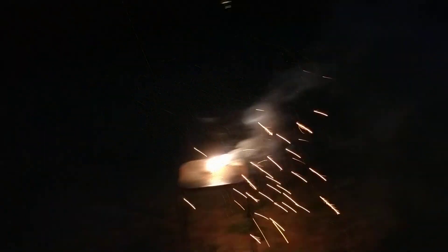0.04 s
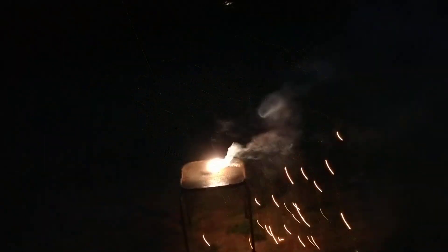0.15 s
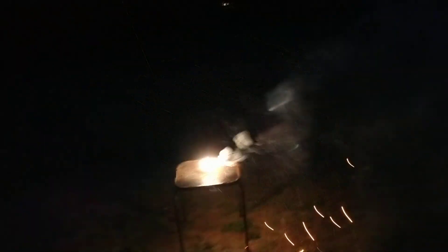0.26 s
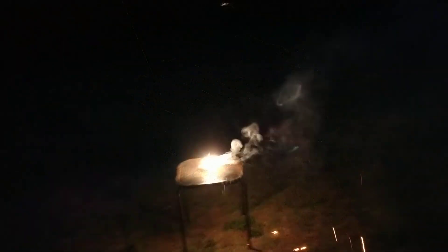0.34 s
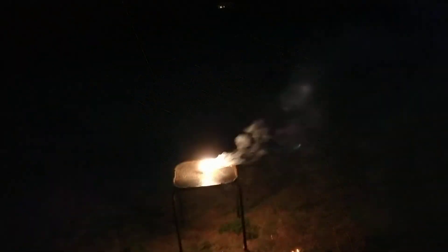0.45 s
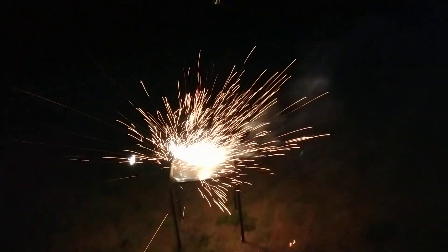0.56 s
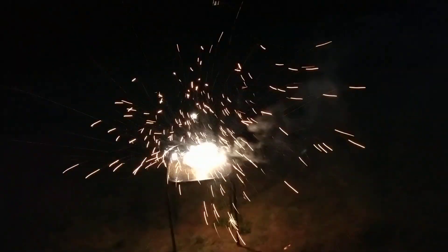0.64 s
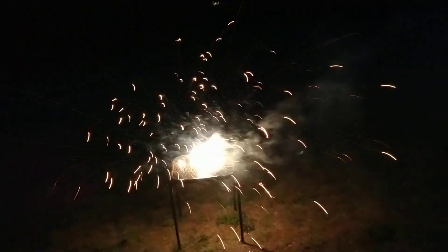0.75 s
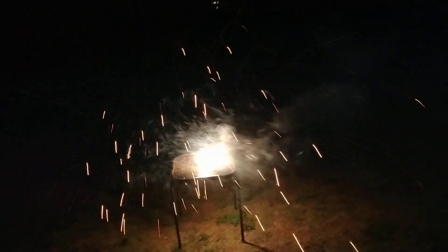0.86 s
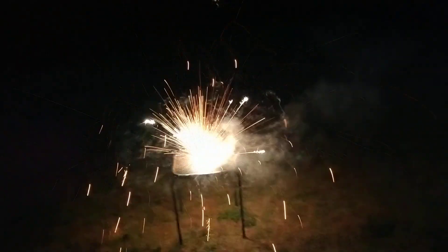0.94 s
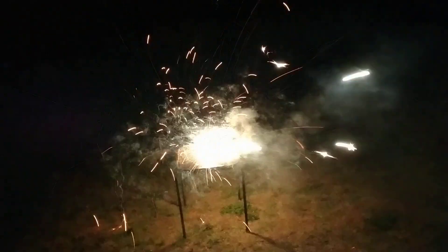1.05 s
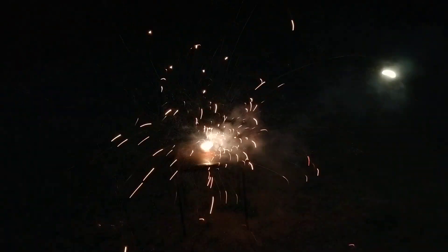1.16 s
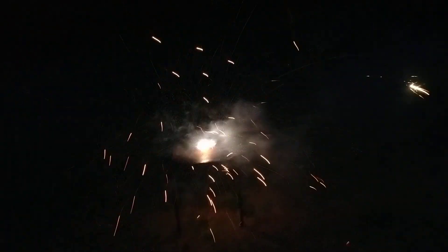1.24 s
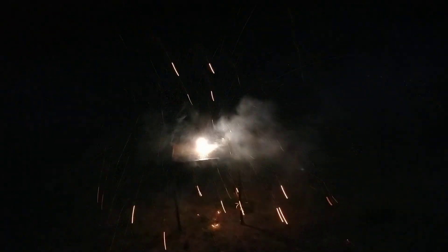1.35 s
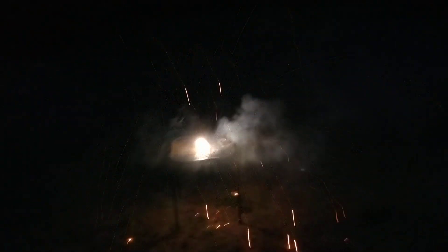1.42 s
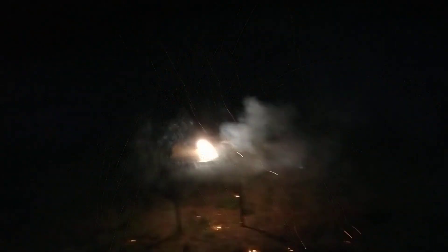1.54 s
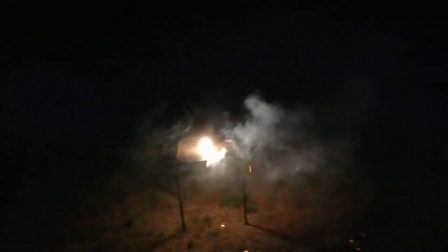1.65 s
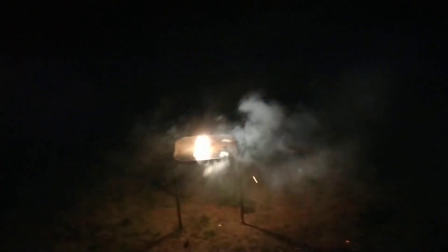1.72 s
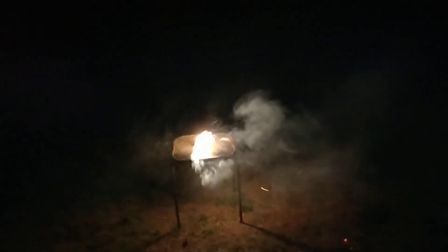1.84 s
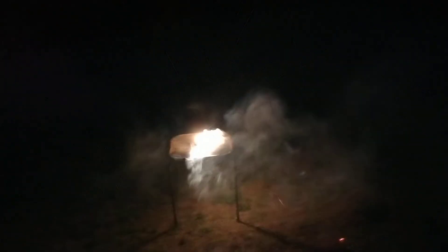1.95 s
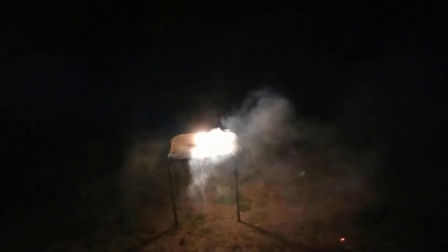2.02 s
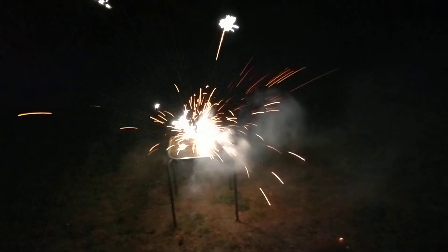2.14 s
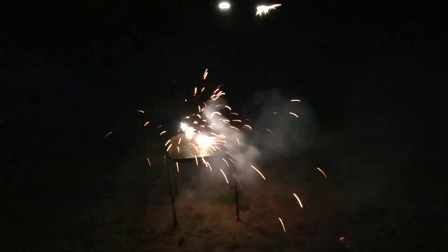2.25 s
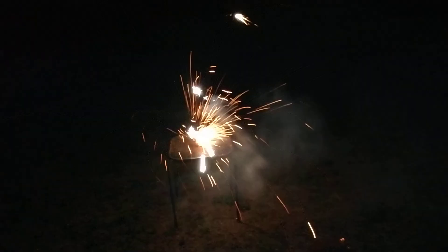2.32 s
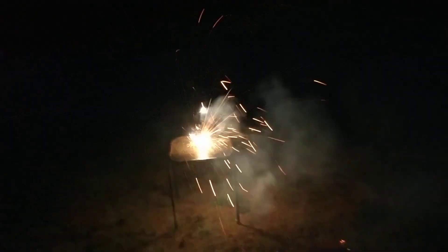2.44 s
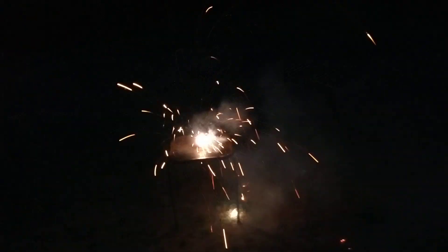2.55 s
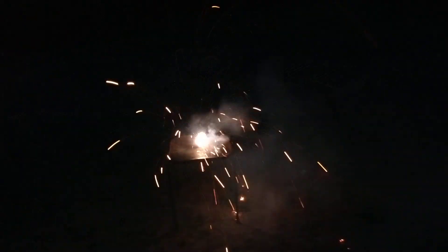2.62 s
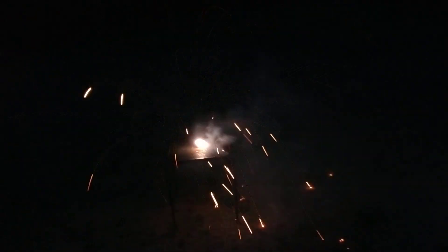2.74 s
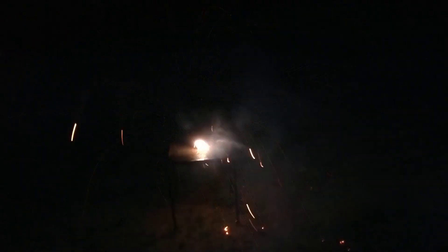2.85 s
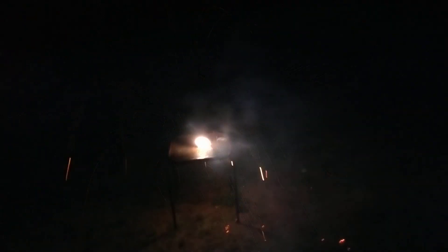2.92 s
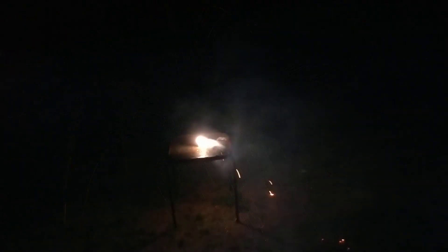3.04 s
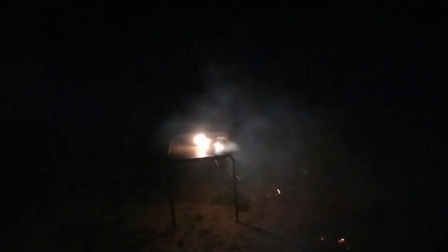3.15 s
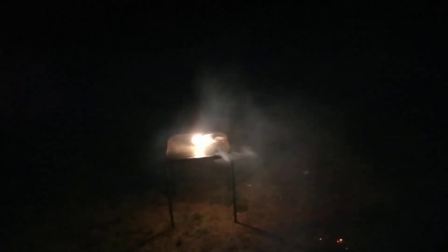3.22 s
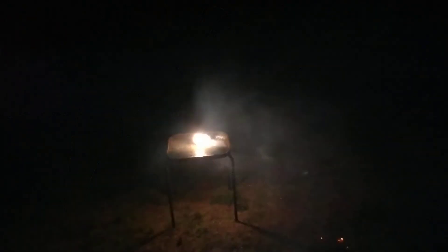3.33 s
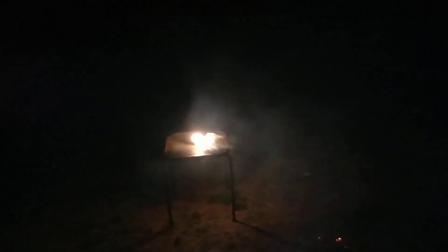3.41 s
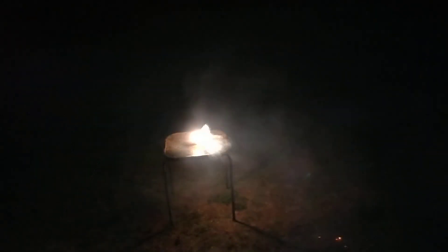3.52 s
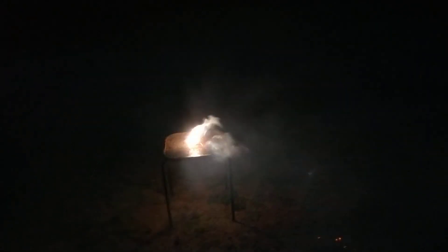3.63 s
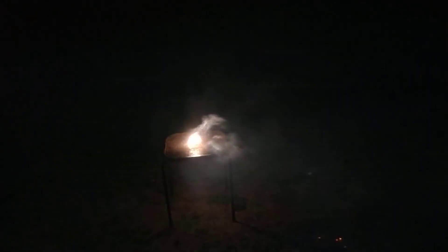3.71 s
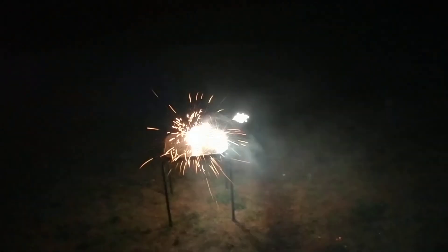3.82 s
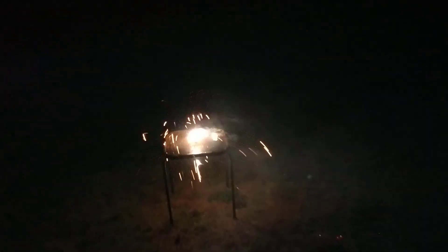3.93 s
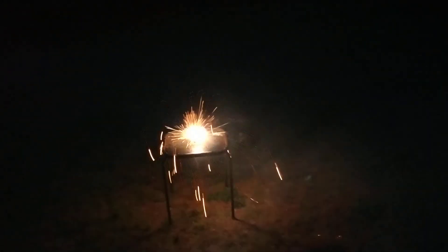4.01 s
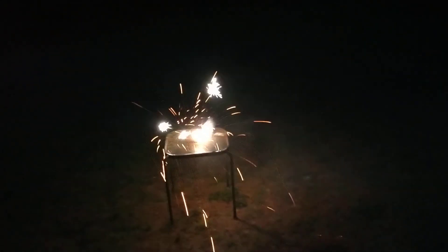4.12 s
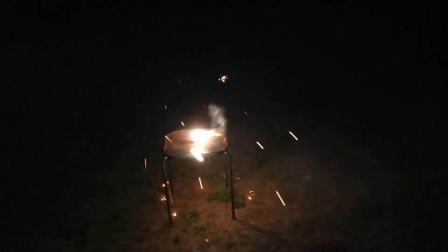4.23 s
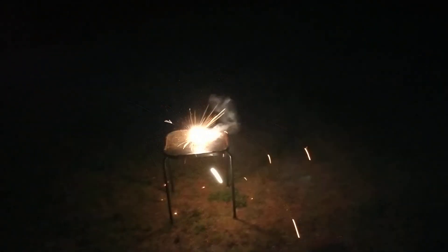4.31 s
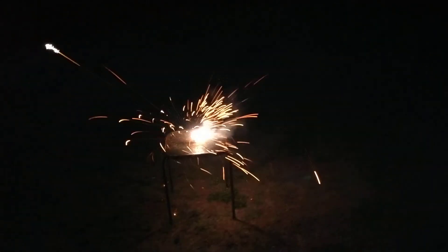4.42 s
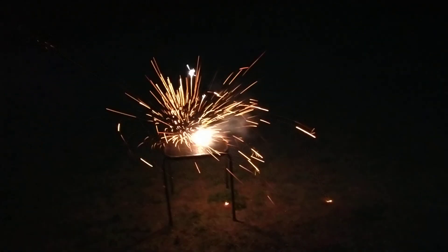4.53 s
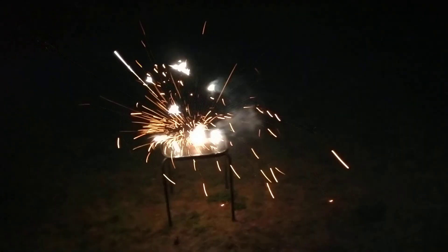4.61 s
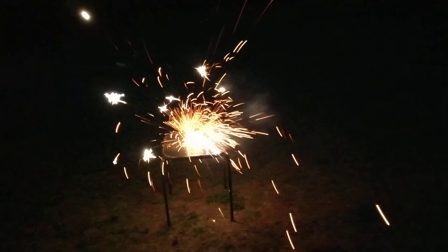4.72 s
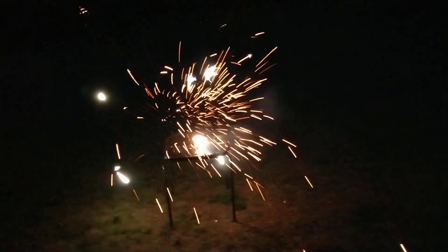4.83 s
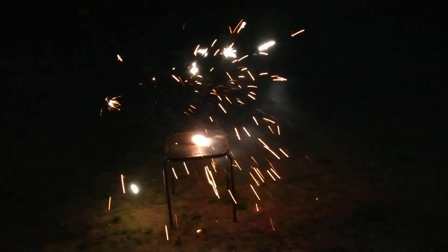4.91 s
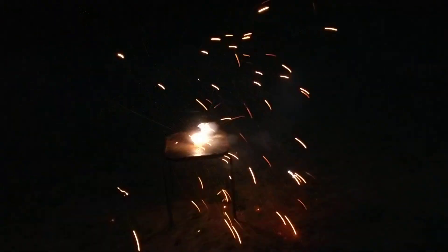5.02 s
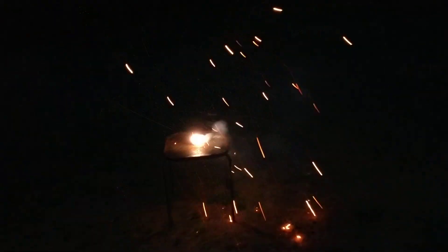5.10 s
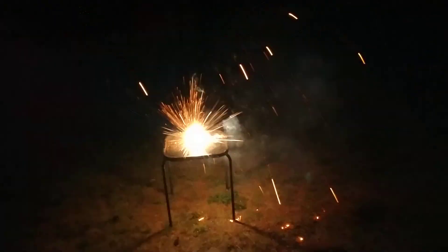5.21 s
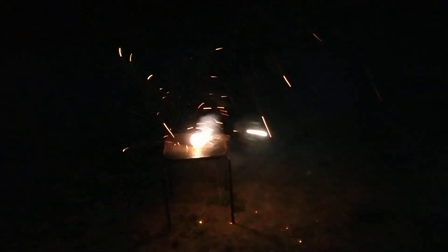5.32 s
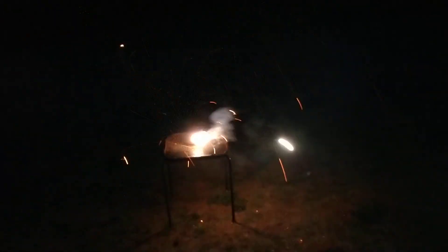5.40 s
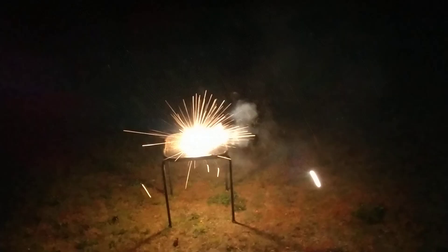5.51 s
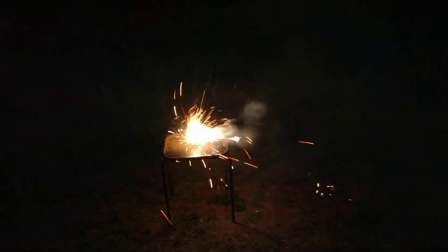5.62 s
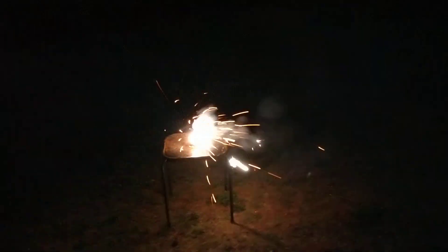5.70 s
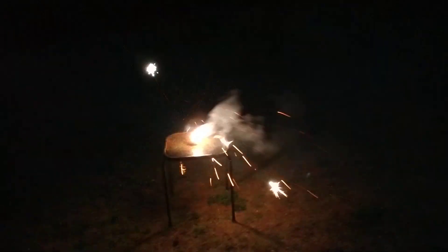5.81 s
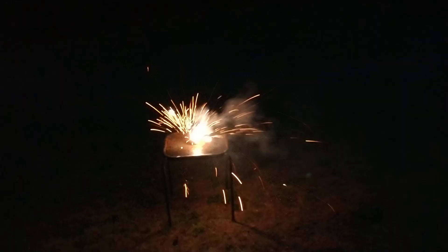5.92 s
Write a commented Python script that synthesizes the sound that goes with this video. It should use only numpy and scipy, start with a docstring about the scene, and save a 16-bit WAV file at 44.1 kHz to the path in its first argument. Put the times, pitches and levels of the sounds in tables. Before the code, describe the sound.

A small firework crackles outdoors at night, hard loud cracks scattered at first, then in quick clusters, over faint flame hiss and dry sputters.

```python
"""First the dying tail of an earlier crack hisses away and dry sputters knock: a small firework burns on
a stool outdoors at night. Its stars crack, scattered at first, then in a fast run, over flame hiss and a trill.
Each star is a noise shock with sharp returns and scatter, an air push (thump) and a sinking boom.
Delayed noise smears echo it from walls and fences, fading noise from the yard.
The flame is coloured noise with flares; the shocks overload the microphone."""
import sys
import numpy as np
from scipy import signal
from scipy.fft import rfft, irfft
from scipy.io import wavfile
from scipy.ndimage import map_coordinates

SR = 44100
rng = np.random.default_rng(int(sys.argv[2]) if len(sys.argv) > 2 else 0)


def generate_wav(signal):
    """Clip the signal to [-1, 1] and save it as 16-bit WAV at the path in sys.argv[1]."""
    frames = np.transpose(np.atleast_2d(signal))
    scaled = np.clip(frames, -1, 1) * 32767
    pcm = np.round(scaled).astype(np.int16)
    wavfile.write(sys.argv[1], SR, pcm)


N = 262836  # samples


def amp(db):
    """Decibels to gain."""
    return 10 ** (np.asarray(db) / 20)


def unit(x):
    """x at rms 1."""
    return x / np.sqrt(np.mean(x ** 2) + 1e-20)


def along(points, hz):
    """Interpolate (f/Hz, value) points on a log frequency axis."""
    f, value = np.transpose(points)
    return np.interp(np.log(hz + 1), np.log(f), value)


def wobble(rate):
    """A smooth random curve through rate random points a second."""
    knots = rng.standard_normal(int(N * rate / SR) + 4)
    return map_coordinates(knots, [np.arange(N) * rate / SR])


def add(track, s, sound):
    """Mix a sound into a track from time s, cut off at the track's end."""
    start = max(round(s * SR), 0)
    part = track[..., start:start + sound.shape[-1]]
    part += sound[..., :part.shape[-1]]


def coloured(x, points, size=4096):
    """A causal minimum-phase filter of the given spectrum that keeps the power of white noise."""
    gain = unit(amp(along(points, np.fft.rfftfreq(size, 1 / SR))))
    # folding the cepstrum onto positive times makes the filter minimum-phase
    cepstrum = irfft(np.log(gain + 1e-6))
    cepstrum[1:size // 2] *= 2
    cepstrum[size // 2 + 1:] = 0
    response = irfft(np.exp(rfft(cepstrum)))
    return signal.fftconvolve(x, response[None], axes=1)[:, :x.shape[1]]


def passed(x, hz, kind, order=2):
    """A causal low- or high-pass."""
    edge = np.clip(hz, 5, SR / 2 - 100)
    return signal.sosfilt(signal.butter(order, edge, kind, fs=SR, output="sos"), x)


def pair(count, alike):
    """Left and right noises that share a part of their power."""
    share = np.clip(alike, 0, 1)
    common = np.sqrt(share) * rng.standard_normal(count)
    return common + np.sqrt(1 - share) * rng.standard_normal((2, count))


def fuller(x, body_db, edge_hz=4200):
    """A bigger charge lifts the middle of the sound against its top."""
    return x + (amp(body_db) - 1) * passed(x, edge_hz, "low", order=1)


def sided(left_db):
    """Gains of the microphone's two sides for a left-minus-right level, at equal power."""
    return unit(amp(np.array([[left_db], [-left_db]]) / 2))


INSECT_HZ, INSECT_DRIFT_HZ = 7790, 29.7  # wing tone and its slow wander


def insect(level_db=-66, rasp_db=0, width_hz=55):
    """A thin trill from the grass: one wandering wing tone with a narrow noise rasp around it."""
    hz = INSECT_HZ + INSECT_DRIFT_HZ * wobble(1.5) + 20 * wobble(20)
    phase = 2 * np.pi * np.cumsum(hz) / SR + np.array([[0], [1]])  # right side 1 rad ahead
    rasp = unit(passed(pair(N, alike=0.28), width_hz, "low"))
    trill = np.sin(phase) + amp(rasp_db) * rasp * np.cos(phase + np.pi / 6)
    return amp(level_db) * unit(trill)


# hiss swells: first the dying tail of an earlier crack, then flare-ups of the jet
# columns: start t/s, length t/s, hiss level/dB
HISS_SWELLS = [(-0.1, 0.091, -43.5), (0.09, 0.51, -56), (0.322, 0.17, -46), (0.801, 0.23, -55),
               (1.538, 0.16, -56), (2.09, 0.1, -57.5), (3.076, 0.068, -63), (3.542, 0.47, -68.5),
               (4.293, 0.74, -56.5)]
FLARE_RISE_S, FLARE_FALL_S = 0.021, 0.12  # time constants
IDLE_DB = -73.5  # hiss between swells


def swelling_hiss_db():
    """Strength of the hiss: it idles, and each swell rises, holds and dies away."""
    t = np.arange(N) / SR
    power = amp(IDLE_DB) ** 2
    for start, length, db in HISS_SWELLS:
        rise = 1 - np.exp(-np.maximum(t - start, 0) / FLARE_RISE_S)
        fall = np.exp(-np.maximum(t - start - length, 0) / FLARE_FALL_S)
        power = power + (amp(db) * rise * fall) ** 2
    return 10 * np.log10(power)


# relative spectrum of the fine hiss; columns: f/Hz, level/dB per Hz
JET_SPECTRUM = [(300, -24), (1500, -0.5), (2300, -4), (3200, -6.5), (4500, -0.5), (6500, -5.5), (10500, 0),
                (14000, -3), (16000, -7.5)]
# relative spectrum of the low roar; columns: f/Hz, level/dB per Hz
ROAR_SPECTRUM = [(25, -30.5), (45, -29.5), (85, -5), (140, -11.5), (210, -17.5), (300, -36), (390, -24),
                 (520, -13.5), (900, -18), (1900, -17.5), (3200, -30.5), (4500, -27.5), (7000, -41),
                 (12000, -58)]
ROAR_DB, ROAR_FOLLOWS = -61, 0.27  # roar at idle; dB it gains per dB of hiss


def flame(sizzle_db=2.5, flutter_db=0.5):
    """The hiss sizzles finely and wavers over a low roar of flame and night air, which swells with it."""
    hiss_db = swelling_hiss_db()
    waver_db = 1.2 * wobble(25)
    sizzle = pair(N, alike=0.074) * amp(sizzle_db * wobble(1000))
    hiss = unit(coloured(sizzle, JET_SPECTRUM)) * amp(hiss_db + waver_db)
    roar_db = ROAR_DB + ROAR_FOLLOWS * (hiss_db - IDLE_DB)
    rumble = unit(coloured(pair(N, alike=0.49), ROAR_SPECTRUM))
    return hiss + rumble * amp(roar_db + flutter_db * wobble(26.0))


# relative spectrum of the hiss scattered back by the yard; columns: f/Hz, level/dB per Hz
YARD_SPECTRUM = [(30, -26.5), (80, -8), (170, -2), (260, -4), (370, -8.5), (800, -12.5), (1400, -11),
                 (1950, -0.5), (3000, -3.5), (4500, 0.5), (8000, 6), (11000, 7), (16000, 5)]
# dying away of that hiss; columns: f/Hz, time to fall 60 dB t/s
YARD_FADE = [(100, 0.75), (400, 0.65), (1000, 1.32), (2000, 0.84), (4000, 0.69), (8000, 0.51),
             (15000, 0.36)]


def yard(level_db=-4.5, growth=1.284, swell_s=0.054, body_share=0.88):
    """Trees and grass scatter every crack into a swelling, long hiss whose high treble dies first."""
    out = np.zeros((2, N))
    for s, db, body_db, _, _ in STAR_BURSTS:
        hz, t, bands = signal.stft(pair(SR, alike=0.033), SR, nperseg=256)
        t60 = along(YARD_FADE, hz)[:, None]
        fade = amp(-60 * t / t60) * (1 - np.exp(-t / swell_s))
        tail = signal.istft(bands * fade, SR, nperseg=256)[1]
        # growth is dB of hiss per dB of crack
        add(out, s, amp(level_db + growth * db) * fuller(tail, body_share * body_db))
    return coloured(out, YARD_SPECTRUM)


# near wall, then far fences and houses, some 4 to 55 m of extra path; columns: delay t/s, level/dB
FAR_RETURNS = [(0.011, -21.5), (.058, -26.5), (0.097, -32.5), (.124, -29), (0.161, -43)]


def far_echoes(thump, level_db=2, dull_hz=230, smear_s=0.023):
    """Walls, fences and houses send the thumps back, dull and smeared."""
    answer = np.zeros((2, SR // 4))
    t = np.arange(SR // 20) / SR
    for delay, db in FAR_RETURNS:
        smear = pair(len(t), alike=0.41) * amp(-60 * t / smear_s)
        add(answer, delay, amp(db + level_db) * smear / np.linalg.norm(smear[0]))
    return signal.fftconvolve(passed(thump, dull_hz, "low"), answer, axes=1)[:, :N]


# fits of sputtering at the stool; columns: start t/s, length t/s, relative level/dB of a usual pop
SPUTTER_FITS = [(0.417, 0.05, -37.5), (0.476, 0.05, -34.5), (3.108, 0.03, -44)]
FIT_POPS_PER_S, FIT_PITCH_HZ = 130, 620
FIT_SPREAD_OCT, FIT_SPREAD_DB = 0.69, 2.5  # standard deviations of pitch and level


def fit_pops(count=32):
    """In a fit, pops follow closely at chance strengths and pitches: rows of (t/s, level/dB, f/Hz)."""
    pops = []
    for start, length, db in SPUTTER_FITS:
        for k, (late, strong, high) in enumerate(rng.standard_normal((count, 3))):
            if k < length * FIT_POPS_PER_S:
                s = start + (k + late / 2) / FIT_POPS_PER_S
                hz = FIT_PITCH_HZ * 2 ** (FIT_SPREAD_OCT * high)
                pops.append((s, db + FIT_SPREAD_DB * strong, hz))
    return pops


# single sputters of the flame, low knocks to a high spit; columns: t/s, relative level/dB, pitch f/Hz
SINGLE_SPUTTERS = [(0.091, -37, 1900), (0.409, -29, 580), (0.475, -26.5, 635), (0.566, -35, 750),
                   (0.844, -35.5, 600), (1.631, -33, 656), (1.899, -34.5, 700), (2.096, -40.5, 2010),
                   (2.852, -33, 540), (3.018, -36, 997), (3.46, -34.5, 17100)]


def sputters(level_db=-9, snap_db=6, t60=0.023, tail_db=-17, tail_s=0.17,
             low_ratio=.5, top_ratio=2.5, fizz_db=-15, fizz_hz=3500):
    """Pockets of powder pop with a dry snap, a dull puff around its pitch and a bit of fizz."""
    out = np.zeros((2, N))
    t = np.arange(SR // 6) / SR
    fade = amp(-60 * t / t60) + amp(tail_db - 60 * t / tail_s)
    for s, db, hz in SINGLE_SPUTTERS + fit_pops():
        # the snap is practically a single damped cycle
        snap = -np.sin(2 * np.pi * hz * t) * np.exp(1 / 2 - 2 * hz * t)
        puff = passed(pair(len(t), alike=0.29), low_ratio * hz, "high", order=3)
        puff = unit(passed(puff, top_ratio * hz, "low", order=6))
        fizz = unit(passed(pair(len(t), alike=.1), fizz_hz, "high"))
        pop = amp(snap_db) * snap + fade * (puff + amp(fizz_db) * fizz)
        add(out, s, amp(db + level_db) * pop)
    return out


USUAL_THUMP_DB, BOOM_DB, BOOM_GROWTH = -21, -23, 1.1  # usual thump, its boom, dB of boom per dB of thump
USUAL_CRACK_DB, BOOM_LOSS = -12, 0.95  # a hard, quick burst booms less: dB of boom lost per dB of crack


def booms(start_hz=135, end_hz=55, sink_s=0.011, t60=0.065, rise_s=0.00018, right_turn=1.0, low_hz=42):
    """The pressure swings back to rest in ever slower cycles, most of all after a big thump."""
    out = np.zeros((2, N))
    t = np.arange(SR // 8) / SR
    sinking_hz = end_hz + (start_hz - end_hz) * np.exp(-t / sink_s)
    turn = 2 * np.pi * np.cumsum(sinking_hz) / SR
    for s, db, _, thump_db, left_db in STAR_BURSTS:
        boom_db = BOOM_DB - BOOM_LOSS * (db - USUAL_CRACK_DB) + BOOM_GROWTH * (thump_db - USUAL_THUMP_DB)
        detune = np.exp(.12 * rng.standard_normal((2, 1)))  # each side swings at its own rate
        swing = np.sin(turn * detune + [[0], [right_turn]])  # right side ahead, in radians
        envelope = amp(boom_db - 60 * t / t60) * (1 - np.exp(-t / rise_s))
        add(out, s, -envelope * swing * sided(left_db))
    return passed(out, low_hz, "high")


def thumps(level_db=14, push_ms=1.9, growth=.3, suck_ms=1.54, suck_db=-9, late_ms=.5, low_hz=95):
    """The gas pushes the air out and soon sucks it back, unequally at the microphone's two sides."""
    out = np.zeros((2, N))
    ms = np.arange(SR // 12) / SR * 1000
    for s, _, _, thump_db, left_db in STAR_BURSTS:
        age = ms - late_ms * np.abs(rng.standard_normal((2, 1)))
        # a bigger charge pushes for longer
        u = np.abs(age) / (push_ms * amp(growth * (thump_db - USUAL_THUMP_DB)))
        pulse = (age >= 0) * (1 - u) * np.exp(-u)
        push = amp(thump_db + level_db) * sided(left_db) * pulse
        add(out, s, push)
        add(out, s + suck_ms / 1000, -push * amp(suck_db))
    return passed(out, low_hz, "high")


# bursting stars; columns: t/s, relative crack level/dB, body level/dB (fullness of the middle),
# relative thump level/dB, thump left-minus-right level/dB
STAR_BURSTS = [(0.618, -12.5, 5, -17, 22), (0.9964, -14, 5, -32.5, 8), (1.0408, -14, 4.5, -23, -12),
               (1.0582, -12, 2, -24, 10.5), (1.1894, -7, 5.5, -18, 12), (2.1712, -12, 6.5, -28, -9),
               (2.1927, -9.5, 5.5, -16.5, -13), (2.3905, -8.5, 5, -19, -9), (2.402, -5, -1, -17.5, -11),
               (2.5653, -10, 0.5, -21.5, -5), (3.8501, -16, 2.5, -14, 6.5), (3.8818, -11.5, -6.5, -22, 0.5),
               (3.953, -11.5, -5, -17, -1), (4.1451, -16, -0.5, -32.5, 12), (4.449, -14.5, 2, -26, 1),
               (4.5904, -12.5, 9, -15, 15.5), (4.6913, -13.5, 10, -15.5, 6.5),
               (4.7688, -8.5, 7.5, -20.5, 4), (4.8239, -5.5, 2, -24.5, 6), (4.8523, -14, 0, -24, -19),
               (5.0532, -10, 1, -16.5, -7), (5.3186, -7, 6.5, -15, -1.5), (5.661, -12, 6, -15.5, 11),
               (5.711, -3.5, -4.5, -19.5, 7)]
# sharp arrivals: direct, ground, something beside it, wall (up to some 4 m of extra path);
# columns: delay t/ms, relative level/dB
SHARP_RETURNS = [(0, -5.5), (1.45, 6.5), (8.8, -7), (12.3, -9)]
# scatter from rough ground, wall and surroundings
# columns: delay t/ms, relative level/dB, time to fall 60 dB t/ms
SCATTER_CLOUDS = [(2.1, 5, 12.3), (7.4, -3, 10), (11.6, -0.5, 78.4), (5.4, -4, 103)]
# relative spectrum of the crack; columns: f/Hz, level/dB per Hz
CRACK_SPECTRUM = [(30, -34.5), (150, -7.5), (350, -15), (650, -8), (1100, -9), (1500, -9.5), (1950, -4),
                  (2800, -7.5), (4000, -5), (6000, -2.5), (8000, -1), (12000, 0), (16000, 0)]


def cracks(level_db=0, shock_db=15, shock_ms=2.25, same=0.69, spiky_db=3, right_lag_ms=0.28,
           right_body_db=2.5):
    """Each shock returns as sharp copies in a cloud of scatter; still surroundings share its grain."""
    out = np.zeros((2, N))
    count = SR // 8
    age = np.arange(count) / SR * 1000 - np.array([[0], [right_lag_ms]])
    surroundings = pair(count, alike=0.081)
    share = np.clip(same, 0, 1)
    power = 0
    for delay, level, t60 in SCATTER_CLOUDS:
        power = power + (age >= delay) * amp(level - 60 * np.abs(age - delay) / t60) ** 2
    shock_fade = (age >= 0) * amp(shock_db - 60 * np.abs(age) / shock_ms)
    for s, db, body_db, _, _ in STAR_BURSTS:
        # single edges and stones make the cloud spiky, in steps of 8 samples
        steps = np.repeat(rng.standard_normal((2, count)), 8, axis=1)[:, :count]
        glints = unit(amp(spiky_db * steps))
        grain = np.sqrt(share) * surroundings + np.sqrt(1 - share) * pair(count, alike=0.035)
        crack = np.sqrt(power) * glints * grain
        shock = passed(pair(count, alike=0.49), 360, "high", order=1) * shock_fade
        for delay, path_db in SHARP_RETURNS:
            # stars burst at slightly different places, so each path varies a little
            varied_ms = delay * (1 + .03 * rng.normal())
            add(crack, varied_ms / 1000, amp(path_db) * shock)
        side_body_db = body_db + np.array([[-right_body_db], [right_body_db]]) / 2
        add(out, s, amp(db + level_db) * fuller(crack, side_body_db))
    return coloured(out, CRACK_SPECTRUM)


def scene(boom_echo_db=-9, crack_left_db=-0.75):
    """Cracks lean slightly right; the thumps echo from all sides, but little of the boom does."""
    thump, boom = thumps(), booms()
    echoed = np.mean(thump + amp(boom_echo_db) * boom, axis=0, keepdims=True)
    background = insect() + flame() + yard() + far_echoes(echoed)
    return background + sputters() + boom + thump + cracks() * sided(crack_left_db)


TOP_HZ = 15900  # upper edge of the sound


def record(dry, top=0.89, hardness=5):
    """The shocks overload the microphone, which flattens their peaks; a low-pass keeps the top smooth."""
    clipped = dry / (1 + np.abs(dry / top) ** hardness) ** (1 / hardness)
    low_pass = signal.firwin(201, TOP_HZ, fs=SR, window="blackman")
    return signal.fftconvolve(clipped, low_pass[None], mode="same", axes=1)


dry = scene()
out = record(dry)
generate_wav(out)
```